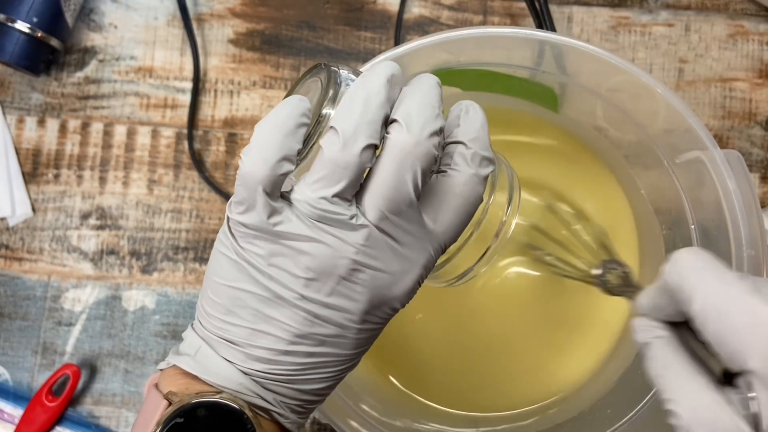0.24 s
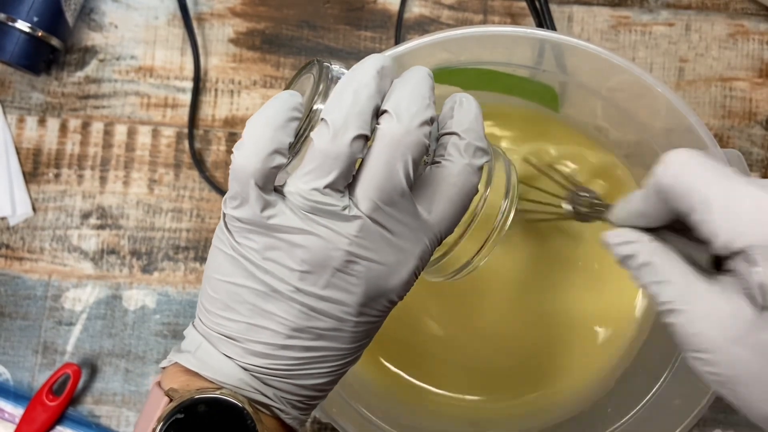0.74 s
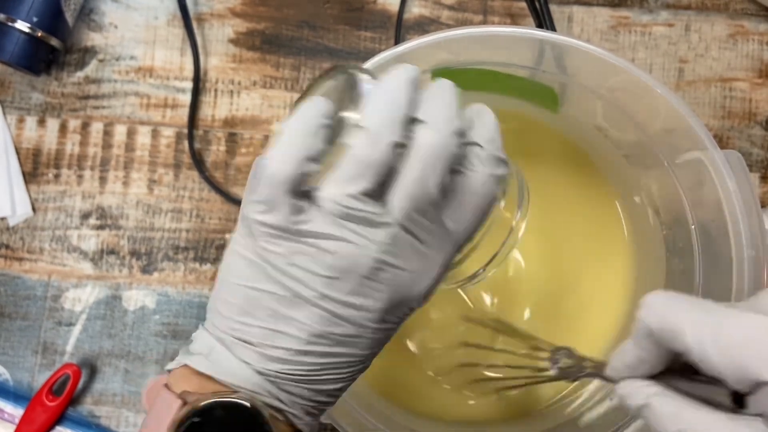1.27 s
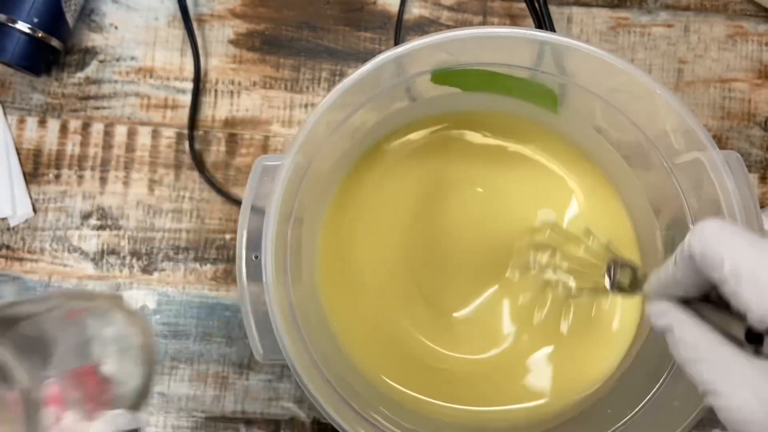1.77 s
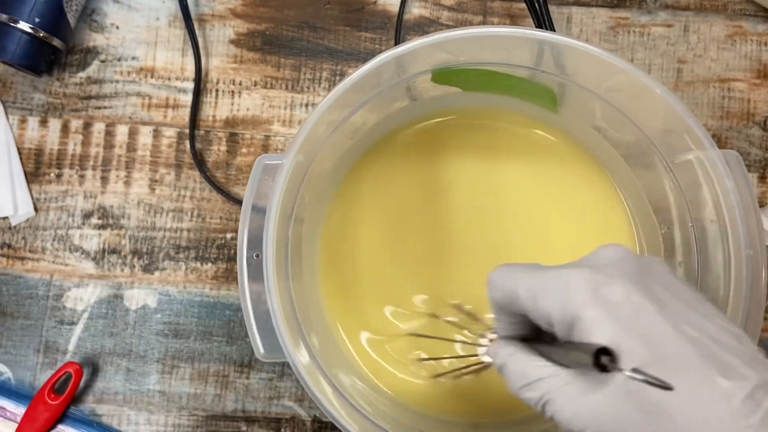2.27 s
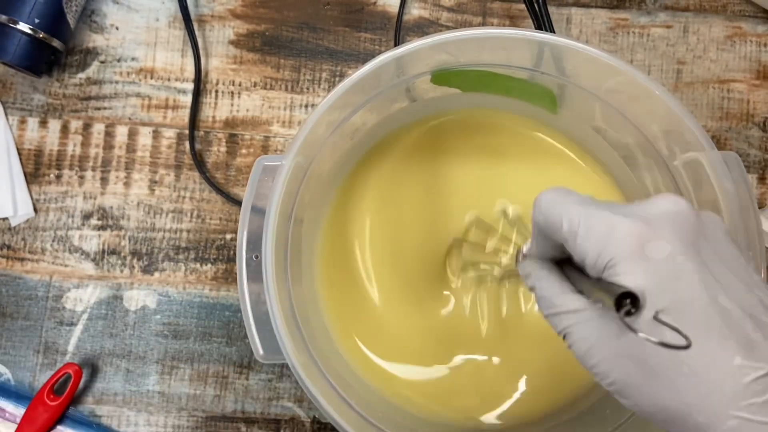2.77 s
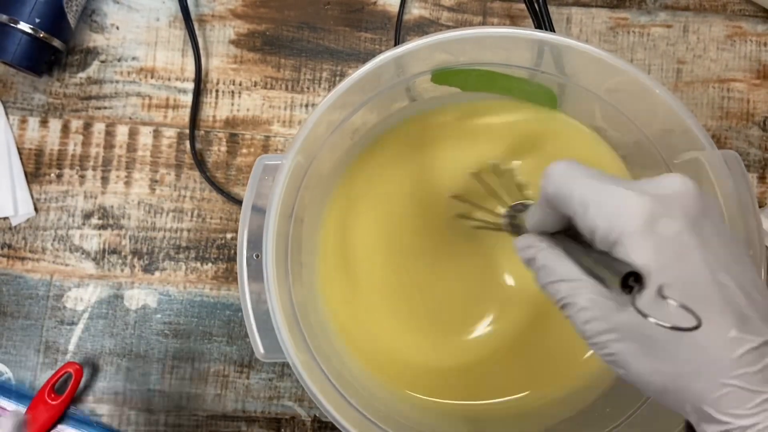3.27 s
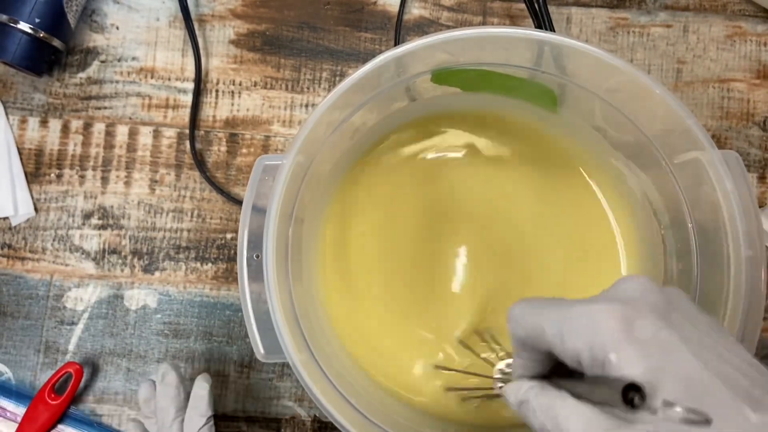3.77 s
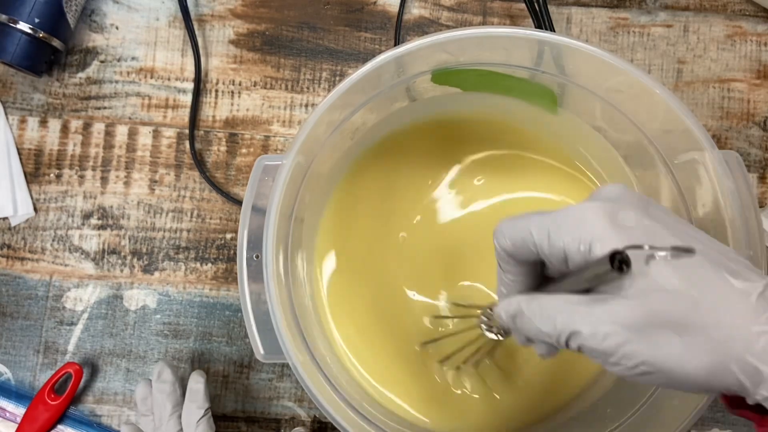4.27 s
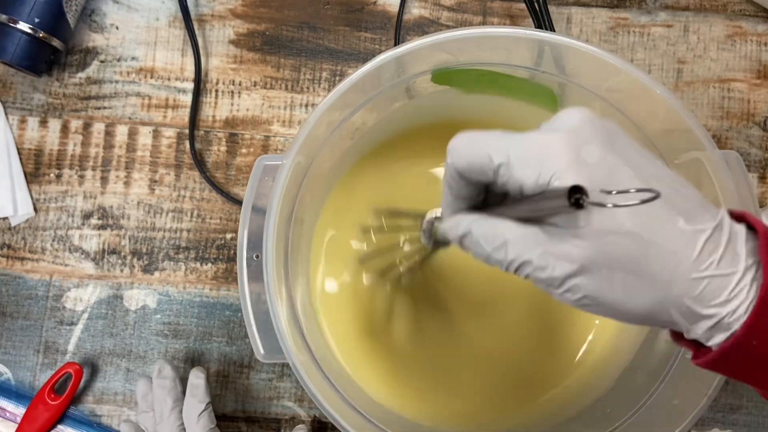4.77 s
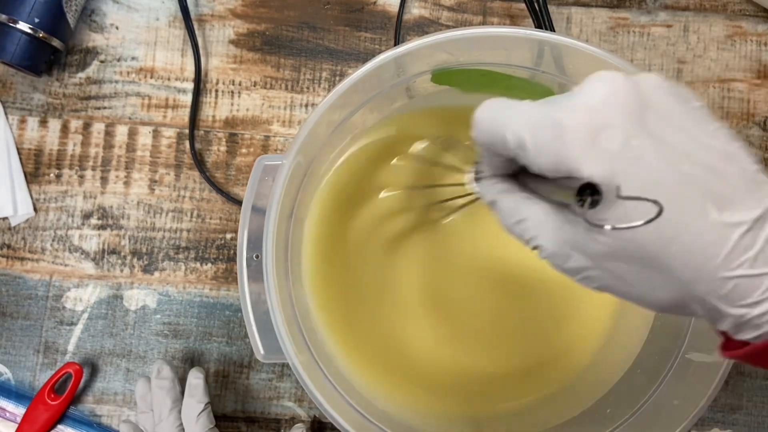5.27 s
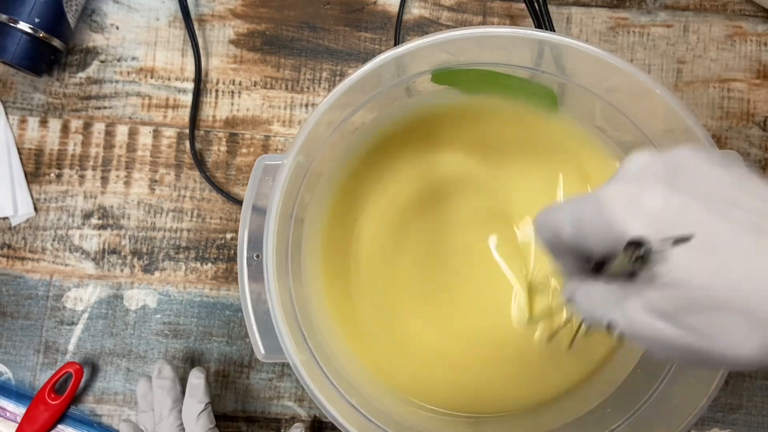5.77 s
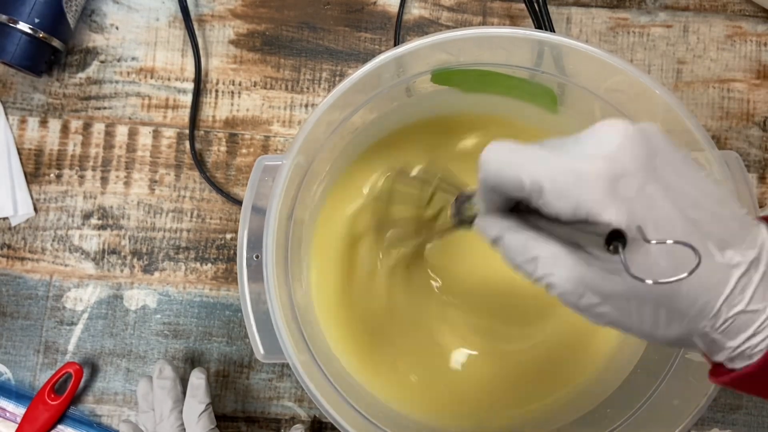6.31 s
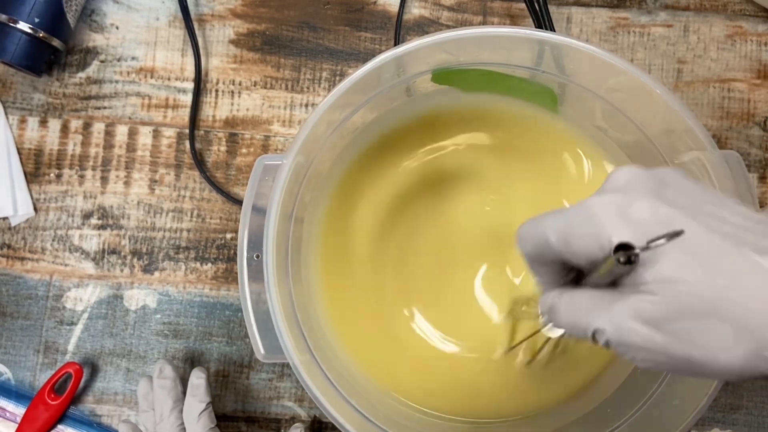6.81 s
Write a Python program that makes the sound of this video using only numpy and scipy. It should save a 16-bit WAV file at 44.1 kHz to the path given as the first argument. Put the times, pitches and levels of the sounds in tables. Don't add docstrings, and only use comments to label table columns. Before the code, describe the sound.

Close up in a small room, a wire whisk stirs thick batter in a plastic tub. Irregular dry taps, brushing wires and faint scraping mix with soft low bumps of the tub on a wooden bench. About a third of the way in, a glass jar rocks down beside it with a bright clink, brief rattle and hard knock. Stirring continues over a steady low fan hum.

```python
import sys
import numpy as np
from scipy import signal
from scipy.fft import rfft, irfft, next_fast_len
from scipy.io import wavfile
from scipy.ndimage import uniform_filter1d, map_coordinates

SR = 44100
rng = np.random.default_rng(int(sys.argv[2]) if len(sys.argv) > 2 else 0)


def to_wav(s):
    ch = np.atleast_2d(s).T
    pcm = np.round(np.clip(ch, -1, 1) * 32767)
    wavfile.write(sys.argv[1], SR, pcm.astype(np.int16))


def level_to_linear(level):
    exponent = np.asarray(level, float) / 20
    return 10 ** exponent


N = 310680

# f/Hz, phase/rad
FAR_LEAD = [(0, 0), (300, .05), (700, 1), (1100, 0), (2100, .1), (3100, .6), (5600, .8), (6750, 3.1416),
            (8000, 3.1416), (9750, 6.2832), (11500, 6.2832), (12650, 9.4248), (14800, 9.4248),
            (15700, 12.2)]


def unit(x):
    return x / np.sqrt(np.mean(x ** 2) + 1e-20)


def along(points, hz):
    f, value = np.transpose(points)
    return np.interp(np.log(hz + 1), np.log(f + 1), value)


def over_time(points):
    return np.interp(np.arange(N) / SR, *np.transpose(points))


def wobble(rate, size=N):
    knots = rng.standard_normal(int(N * rate / SR) + 4)
    return map_coordinates(knots, [np.arange(size) * rate / SR])


def filtered(x, response):
    m = next_fast_len(N + SR // 2)
    return irfft(rfft(x, m) * response(np.fft.rfftfreq(m, 1 / SR)), m)[..., :N]


def shaped(x, spectrum):
    return filtered(x, lambda hz: level_to_linear(along(spectrum, hz)))


def modes(table):
    def response(f):
        total = 0
        for k, (centre, width, db) in enumerate(table):
            damping = 1j * f * abs(width)
            total = total + (-1) ** k * level_to_linear(db) * damping / (centre * centre - f * f + damping)
        return total
    return response


def bursts(times, level_db, t60, first=0):
    force, t = np.zeros(N + SR), np.arange(SR // 14) / SR
    harder_start = 1 + .6 * level_to_linear(-60 * t / .005)
    grit = rng.standard_normal((len(times), len(t))) * harder_start + first * (t == 0)
    for s, db, life, g in zip(times, level_db, np.broadcast_to(t60, len(times)), grit):
        force[round(s * SR):][:len(t)] += level_to_linear(db - 60 * t / max(life, .003)) * g
    return force[:N]


def damped_notes(table, attack, boost_db):
    out, t = np.zeros(N + SR), np.arange(SR // 3) / SR
    swell = 1 - np.exp(-t / attack)
    for s, db, hz, t60 in table:
        decay = level_to_linear(db + boost_db - 60 * t / max(t60, .01))
        out[round(s * SR):][:len(t)] += decay * swell * np.sin(2 * np.pi * hz * t)
    return out[:N]


def rush(spectrum, patchy_db):
    z = signal.stft(rng.standard_normal((2, N)), nperseg=512)[2]
    field = rng.standard_normal(z.shape[1:])
    field = uniform_filter1d(uniform_filter1d(field, 6, 0), 10, 1)
    pair = signal.istft(z * level_to_linear(patchy_db * unit(field)), nperseg=512)[1][:, :N]
    return unit(shaped(pair, spectrum))


def fan():
    # f/Hz, level/dB per Hz
    fan_spectrum = [(20, -25), (33, -29), (42, -15.5), (58, -4.5), (78, -5), (110, -5), (150, -6.5),
                    (200, -15), (300, -15), (400, -48.5)]
    return level_to_linear(-36.0 + 1.1 * wobble(8.3)) * rush(fan_spectrum, patchy_db=1.54)


def motor_hum():
    # t/s, level/dB
    hum_level = [
        (0.0, -39),
        (1.19, -35.5),
        (2.16, -44),
        (2.39, -26.5),
        (3.45, -47),
        (3.65, -40),
        (6.61, -32),
        (7.04, -50),
    ]
    hz = 58.5 + 2.33 * wobble(8)
    phase = 2 * np.pi * np.cumsum(hz) / SR
    return level_to_linear(over_time(hum_level) + 1.7 * wobble(29)) * np.sin(phase)


def room_air():
    # f/Hz, level/dB per Hz
    air_spectrum = [(150, -13), (250, -4.5), (360, -0.5), (440, 2), (520, 1), (600, -5), (680, -8.5),
                    (950, -8.5), (1200, -58)]
    return level_to_linear(-39 + 0.42 * wobble(12)) * rush(air_spectrum, patchy_db=1.48)


def batter_drag():
    # f/Hz, level/dB per Hz
    drag_spectrum = [(700, -2), (1000, 0.5), (2000, -2), (2700, -1.5), (2900, -0.5), (3150, -4.5),
                     (3600, -5.5), (4300, -4), (6200, -8), (7500, -7.5), (10000, -16.5), (13000, -20),
                     (15000, -48), (15700, -14), (15900, -60)]
    return level_to_linear(-43.5 + 1.16 * wobble(14)) * rush(drag_spectrum, patchy_db=1.54)


def scrape():
    # t/s, level/dB
    pressure = [(0.0, -51), (0.45, -48), (1.12, -49.5), (1.45, -48.5), (1.86, -51), (2.55, -48),
                (3.22, -47), (3.71, -50.5), (4.29, -51.5), (4.65, -48), (5.0, -49), (5.23, -49),
                (5.51, -47.5), (6.04, -47), (6.3, -47.5), (7.04, -51)]
    # f/Hz, width/Hz, level/dB
    floor_modes = [(493, 130, 4), (1250, 68, 0.5), (1507, 123, -1), (2040, 250, -3), (2250, 150, -3),
                   (2850, 100, -7.5)]
    mean_db, swing, clump_db, grain_db = -49, 2.1, 6, 5
    pressure_db = over_time(pressure)
    scatter_db = clump_db * np.tanh(wobble(22)) + grain_db * np.tanh(wobble(130))
    grains = level_to_linear(scatter_db) * rng.standard_normal(N)
    level_db = mean_db + swing * (pressure_db - pressure_db.mean())
    return level_to_linear(level_db) * unit(filtered(grains, modes(floor_modes)))


def whisk():
    # t/s, peak level/dB, bright level/dB, hollow level/dB, low wall level/dB
    firm_taps = [(0.2169, -17, -13.5, -10, -5), (0.6624, -18.5, -11, -3, -12),
                 (1.0076, -21.5, -10.5, -8, -7.5), (1.1892, -24.5, -17, -4.5, -10),
                 (1.3006, -13, -22, -15, -8), (1.3508, -21.5, -13.5, -5, -7), (1.5, -18, -21, -13, -14),
                 (1.9145, -14, -18.5, -10, -8.5), (2.374, -14.5, -15, -6, -11.5), (2.7919, -18, -9, -5, -3),
                 (2.953, -24, -25, -10, -12), (2.9614, -14.5, -25, -16, -13),
                 (2.971, -12, -20.5, -12.5, -16), (3.168, -20, -9, -5, -6), (3.3301, -12.5, -26, -9, -14),
                 (3.3384, -19, -11, -3, -6), (4.1745, -21, -10.5, -4, -8), (5.3693, -22, -16.5, -7.5, -21),
                 (5.7379, -23.5, -15, -10, -5), (5.758, -21, -15.5, -6.5, -16),
                 (6.0672, -19, -13, -11, -12), (6.7425, -21.5, -13, -5, -8),
                 (6.8242, -23, -21.5, -11, -4.5), (6.9489, -13.5, -18.5, -10.5, -19)]
    # t/s, peak level/dB, bright level/dB, low wall level/dB
    light_taps = [(0.4544, -24, -18, -12), (0.5112, -24, -19, -12), (0.6684, -27, -14, -3),
                  (0.7118, -24.5, -14, -12), (0.8405, -23, -15, -6.5), (1.484, -25, -29, -9.5),
                  (1.5643, -29, -22, -16), (1.7848, -24.5, -22, -5.5), (3.1814, -20, -16, -10),
                  (3.5352, -25.5, -22, -9), (4.3935, -23.5, -17, -5.5), (4.4751, -28, -21, -2),
                  (4.57, -28, -18, -14), (4.5817, -19.5, -17, -17), (4.99, -25, -19, -3.5),
                  (5.0962, -23, -28, -10), (5.3463, -23, -23, -3.5), (5.388, -22, -17, -15),
                  (5.7138, -25, -19, -12), (6.1118, -27, -17, -11), (6.1673, -24, -17, -4),
                  (6.2785, -27, -13.5, -13), (6.4017, -27, -29, -9), (6.427, -24.5, -16, -9),
                  (6.489, -21, -24, -6.5), (6.5997, -23, -18, -14), (6.629, -25.5, -22, -9),
                  (6.774, -20.5, -11, -15), (6.9554, -26, -13, -13), (7.018, -19, -8, -7)]
    # t/s, peak level/dB
    faint_taps = [(.172, -32), (.3511, -26), (.3714, -28), (.56, -32), (2.2842, -40), (2.2942, -45),
                  (3.5219, -32), (3.6945, -32), (3.9305, -33), (4.6693, -31), (4.8623, -31), (5.3313, -31),
                  (5.9813, -31), (6.31, -41), (6.442, -32), (.3895, -28), (.4349, -34), (.7402, -30.5),
                  (.7652, -31), (1.4351, -30), (1.7669, -28), (2.1365, -29), (2.6276, -30), (2.6647, -31),
                  (2.7315, -30), (2.7414, -30), (3.7058, -29), (3.8724, -29.5), (4.051, -28),
                  (4.1954, -36), (4.734, -29), (4.7953, -31.5), (4.95, -31.5), (5.0135, -27),
                  (5.0284, -27.5), (5.2117, -34), (5.2733, -29), (5.4685, -29.5), (5.5451, -31.5),
                  (5.5811, -32), (5.835, -25), (5.9457, -32), (6.0979, -32), (6.7614, -28)]
    # t/s, peak level/dB
    ticks = [(0.218, -26), (0.6624, -19.5), (0.7633, -16.5), (0.8405, -42), (1.0076, -35), (1.3498, -32),
             (1.9131, -29), (2.3736, -25), (2.7911, -39), (4.582, -32), (5.738, -36), (6.0666, -39),
             (6.7416, -42), (6.9481, -40), (7.0179, -39)]
    # f/Hz, width/Hz, level/dB
    hollow_modes = [(451.2, 89, 10), (473.3, 138, 9.5)]
    low_modes = [(1157, 43, 6), (1330, 84, -3), (1460, 57, 3.5)]
    high_modes = [(1692, 62, -3), (2040, 116, 0), (2238, 53, -1.5), (2427, 70, -4), (2880, 160, -11.5)]
    # f/Hz, level/dB per Hz
    dull_wire = [(2500, -15), (3500, 3), (5300, 4.5), (7000, 1), (10000, -2), (14500, -6), (16500, -3)]
    bright_wire = [(3500, -40), (4800, -5), (5600, 0), (6800, -4), (9500, -0.5), (11500, -1.5), (14500, -6),
                   (16500, -10)]

    glancing = np.insert(light_taps, [3], -10, axis=1)
    faint_db = (-15.5, -6, -8)  # bright, hollow and low wall shares, scattered by 1 dB
    shares = faint_db + 1 * rng.standard_normal((len(faint_taps), len(faint_db)))
    faint_rows = np.hstack([faint_taps, shares])
    s, db, bright, hollow, low = np.vstack([firm_taps, glancing, faint_rows]).T

    t60, first_blow = 0.03, 5.3
    out = filtered(bursts(s, db + 7.5, t60, first_blow), modes(high_modes))
    out += filtered(bursts(s, db + low + 14.5, t60, first_blow), modes(low_modes))
    out += filtered(bursts(s + .003, db + hollow + 18.5, 1.2 * t60), modes(hollow_modes))
    out += shaped(bursts(s, db + bright + 2.0, t60), dull_wire)
    tick_s, tick_db = np.transpose(ticks)
    return out + shaped(bursts(tick_s, tick_db - 3.5, 0.023), bright_wire)


def pings():
    # t/s, peak level/dB, f/Hz
    ping_events = [(.512, -32, 2160), (.713, -28, 1860), (.841, -27, 1990), (1.0071, -16, 2070),
                   (1.1892, -16, 2040), (1.3002, -10, 1980), (1.302, -15, 1420), (1.3008, -14, 1650),
                   (1.301, -13, 1140), (1.564, -22, 2035), (1.9145, -17, 2160), (2.9532, -18, 1180),
                   (3.331, -29, 2330), (3.333, -15, 1110), (4.177, -16, 1460), (4.582, -26, 2010),
                   (5.2121, -35, 2060), (5.3875, -24, 2040), (6.2781, -20.5, 2056), (6.6, -27, 2120),
                   (5.143, -38, 2850), (5.175, -33, 2850), (5.7383, -20, 1300), (5.3469, -27, 1250),
                   (6.949, -20, 2195), (6.95, -25, 4020), (4.95, -28, 1230), (4.951, -36, 1960),
                   (5.012, -28, 2060), (5.346, -28, 1980), (5.369, -24, 2150), (5.714, -29, 1300),
                   (5.758, -27, 1950), (5.545, -32, 2060), (5.468, -30, 1290), (6.068, -24, 2650),
                   (6.098, -34, 2020), (6.112, -29, 2010), (6.262, -35, 2050), (6.31, -30, 2000),
                   (6.33, -32, 2050), (6.358, -34, 1900), (6.37, -33, 1300), (6.402, -32, 1300),
                   (6.49, -32, 1410), (6.49, -30, 2500), (6.629, -30, 2000), (6.648, -31, 1460),
                   (.436, -29, 1970), (.512, -31, 1200), (.218, -29, 2170), (.664, -26, 2050),
                   (.665, -27, 1110), (2.4535, -11, 2400), (2.458, -17, 2920), (2.471, -14, 2400),
                   (2.482, -22, 2440), (2.501, -15, 2420), (2.561, -21, 2090), (1.3005, -24.5, 2620)]
    t60, roughness = 0.028, 0.18
    rings = damped_notes([(*row, t60) for row in ping_events], attack=0.0013, boost_db=-1.5)
    return (1 + roughness * wobble(350)) * rings


def thumps():
    # t/s, peak level/dB, f/Hz
    soft_bounces = [(0.463, -30, 106), (1.015, -35, 106), (1.593, -29.5, 120), (1.803, -23.5, 140),
                    (2.148, -26, 127), (2.338, -21, 95), (2.372, -25, 110), (2.503, -19.5, 130),
                    (2.809, -24, 142), (2.976, -18, 128), (3.155, -34, 145), (3.346, -19.5, 139),
                    (3.878, -31.5, 160), (4.207, -29.5, 162), (4.52, -24, 133), (4.604, -29.5, 109),
                    (5.031, -23, 150), (5.385, -18, 138), (5.765, -21, 143), (6.073, -19, 137),
                    (6.12, -23.5, 143), (6.398, -28, 142), (6.752, -24, 139), (7.03, -19, 152)]
    # t/s, peak level/dB, f/Hz, t60/s
    hard_knocks = [(2.395, -16, 400, 0.035), (2.399, -24, 500, .06), (2.41, -13, 102, .16),
                   (1.307, -19, 268, 0.038), (3.8, -40, 500, 0.032), (2.5025, -8.5, 644, 0.042),
                   (2.5005, -9.5, 850, 0.022), (2.475, -24, 430, .05), (2.53, -25, 410, .06),
                   (2.456, -20, 687, .04), (.222, -31, 488, 0.046), (0.59, -27, 480, .04),
                   (2.398, -20, 217, 0.046), (1.307, -13.5, 137, 0.066), (2.5, -21, 1200, 0.022),
                   (1.3055, -16, 480, 0.035), (4.175, -21, 514, 0.035), (2.8, -26, 380, 0.028),
                   (1.304, -16, 810, 0.024)]
    # t/s, peak level/dB, f/Hz, t60/s
    sways = [
        (3.5, -27, 66, 0.16),
        (2.1, -22, 91, 0.15),
        (4.19, -22, 64, 0.19),
        (7.5, -24, 61, .2),
        (2.2, -30, 64, 0.26),
    ]
    t60 = 0.092
    bounces = [(*row, t60) for row in soft_bounces] + hard_knocks
    return damped_notes(bounces, attack=0.0036, boost_db=6.5) + damped_notes(sways, attack=0.015, boost_db=8.0)


def jar_settling():
    # t/s, peak level/dB, f/Hz, t60/s
    rim_ring = [
        (2.52, -29, 4168, .25),
        (2.8, -30, 1400, .3),
        (2.501, -14, 660, .06),
        (2.499, -16, 900, .03),
        (2.5, -21, 1300, .035),
        (2.454, -20, 2800, .05),
        (2.1, -22, 760, .04),
        (2.63, -18, 740, 0.056),
        (2.735, -27, 700, .05),
    ]
    return damped_notes(rim_ring, attack=.008, boost_db=5.5) * np.array([[1], [-.6]])


def jar():
    # t/s, ring level/dB, rattle level/dB, knock level/dB
    contacts = [(2.394, -67, -36, -26), (2.453, -13, -17, -18), (2.4575, -32, -19, -19),
                (2.47, -39, -18.5, -23.5), (2.482, -38, -22, -23), (2.4992, -35, -22.5, -11),
                (2.503, -50, -23, -9.5), (2.514, -38, -36, -18), (2.522, -48, -37, -18.5),
                (2.532, -46, -32, -21), (2.543, -45, -42, -23), (2.56, -56, -33.5, -36)]
    glass_hz = [1400, 1750, 2428, 2465, 2567, 2770, 3530, 3720, 4168, 4403, 5022, 5254, 6363, 6672, 7785,
                8414, 9055, 9700, 10430, 10822, 12240, 12630, 12800, 14900]
    # level/dB, t60/s
    glass_decay = [(-26, 0.3), (-6.5, 0.36), (-2.5, 0.19), (0, 0.16), (-4, 0.13), (2.5, 0.078), (-8, 0.15),
                   (-20, 0.18), (-6.5, 0.24), (-15, 0.15), (-3, 0.14), (-14, 0.3), (-13, 0.34),
                   (-7.5, 0.28), (-8, 0.24), (-17, 0.26), (-12.5, 0.14), (-13, 0.18), (-8.5, 0.2),
                   (-7, 0.19), (-12, 0.15), (-20, 0.15), (-10, .17), (-17, .07)]
    # t/s, peak level/dB, f/Hz, t60/s
    late_ring = [
        (2.485, -27, 7785, .45),
        (2.525, -21, 4168, .18),
        (2.52, -33, 5254, .2),
    ]
    # f/Hz, width/Hz, level/dB
    bench_modes = [(340, 190, -9.5), (478, 40, 2.5), (650, 170, -4.5), (823, 170, 1), (1150, 100, 0),
                   (1370, 87, -3), (1780, 120, -4), (2490, 130, -7)]

    s, ring_db, rattle_db, knock_db = np.transpose(contacts)
    out, t = np.zeros(N + SR), np.arange(SR // 2) / SR
    ring = np.zeros(len(t))
    for hz, (db, t60) in zip(glass_hz, glass_decay):
        roughness = 1 + 0.5 * wobble(150, size=len(t))
        tone = np.sin(2 * np.pi * hz * t + 6 * rng.random())
        ring += roughness * level_to_linear(db - 60 * t / t60) * tone
    ring *= level_to_linear(-260 * t ** 2)
    for start, db in zip(s, ring_db):
        out[round(start * SR):][:len(t)] += level_to_linear(db - 8) * ring

    rattle_spectrum = [(700, -7), (2500, 11.0), (4800, 1.0), (6300, -3.0), (7200, -15), (10000, -15),
                       (11500, -28), (16000, -40)]
    rattle = shaped(bursts(s, rattle_db, 0.082), rattle_spectrum)
    knock = filtered(bursts(s, knock_db + 12.5, 0.047), modes(bench_modes))
    return out[:N] + damped_notes(late_ring, attack=0.055, boost_db=2.0) + rattle + knock


def echoes(near):
    # delay t/s, left level/dB, right level/dB
    walls = [
        (.0031, -8, -22),
        (.0057, -22, -9),
        (.0092, -15, -26),
        (.0141, -26, -17),
    ]

    def response(hz):
        paths = sum(level_to_linear([[left], [right]]) * np.exp(-2j * np.pi * hz * s) for s, left, right in walls)
        return (hz > 450) * paths
    return filtered(near, response)


def room(x):
    # f/Hz, t60/s
    decay_time = [(200, 0.25), (2000, 0.057), (10000, 0.082)]
    hz, t, z = signal.stft(rng.standard_normal((2, SR // 2)), SR, nperseg=256)
    z = z * level_to_linear(-60 * t / along(decay_time, hz)[:, None])
    tail = signal.istft(z, SR, nperseg=256)[1]
    delayed = np.pad(x, (300, 0))[None]
    return signal.fftconvolve(delayed, tail / np.linalg.norm(tail[0]), axes=1)[:, :N]


def partly_alike(diffuse):
    # f/Hz, correlation
    likeness = [(90, .995), (260, .94), (520, .92), (690, .2), (1100, .4), (1850, .87), (2800, .4),
                (4200, .72), (6300, .75), (8700, .55), (15000, .5)]

    def split(hz):
        lead = np.interp(hz, *np.transpose(FAR_LEAD))
        locked = (hz > 6000) & (abs(np.sin(lead)) < .01)
        turn = np.arccos(np.where(locked, .999, along(likeness, hz))) / 2
        return np.array([np.cos(turn), np.sin(turn)])
    shared, differing = filtered(diffuse, split)
    return np.array([shared + differing, shared - differing])


def ports(pair, lead):
    # f/Hz, level/dB
    lean = [(60, -1), (170, -1.9), (260, -1.2), (430, -2.2), (640, -5.8), (950, -3), (1250, .5),
            (2000, -.8), (4000, 0)]

    def response(hz):
        half = level_to_linear(along(lean, hz) / 2) * np.exp(.5j * np.interp(hz, *np.transpose(lead)))
        return np.array([half, 1 / half])
    return filtered(pair, response)


def scene():
    # f/Hz, phase/rad
    near_lead = [(0, 0), (300, .05), (700, 1.1), (1000, .9), (1250, .4), (2100, .3), (3000, 1), (5200, .5),
                 (7200, 3), (10400, 6.2), (13400, 9.4), (16500, 12.6)]
    near = scrape() + whisk() + pings() + thumps() + jar()
    background = fan() + motor_hum() + room_air() + batter_drag()
    diffuse = background + level_to_linear(-12.0) * room(near)
    direct = ports(near + echoes(near), near_lead)
    return jar_settling() + direct + ports(partly_alike(diffuse), FAR_LEAD)


def low_pass(x):
    return signal.sosfilt(signal.butter(12, 16990, fs=SR, output="sos"), x)


def record(dry):
    # t/s, level/dB
    treble_dip = [
        (2.565, 0),
        (2.59, -30),
        (2.636, -30),
        (2.65, 0),
    ]
    # f/Hz, level/dB
    band_limit = [(15750, 0), (15850, -40), (16700, -44), (16900, -100)]
    treble = filtered(dry, lambda hz: (hz > 8000) & (hz < 11000))
    dry = dry - treble * (1 - level_to_linear(over_time(treble_dip)))
    rounded = dry / (1 + abs(dry / .95) ** 4) ** (1 / 4)
    return low_pass(shaped(rounded, band_limit))


dry = scene()
out = record(dry)
to_wav(out)
```